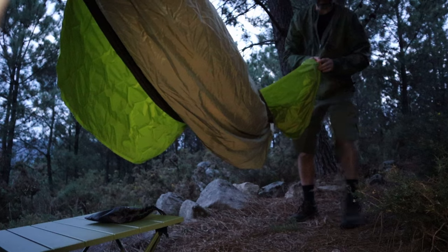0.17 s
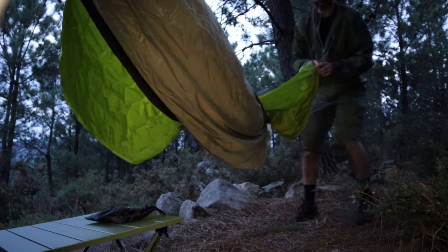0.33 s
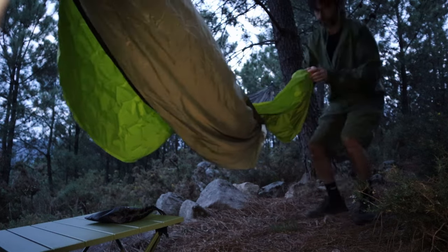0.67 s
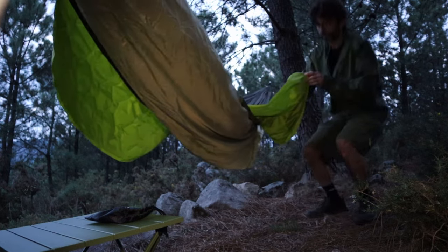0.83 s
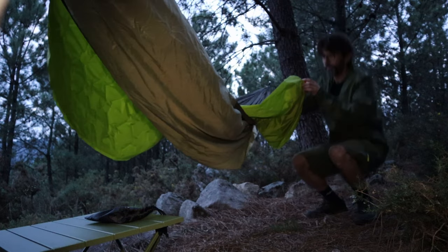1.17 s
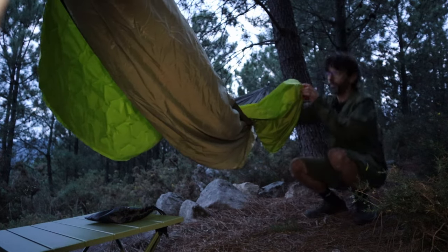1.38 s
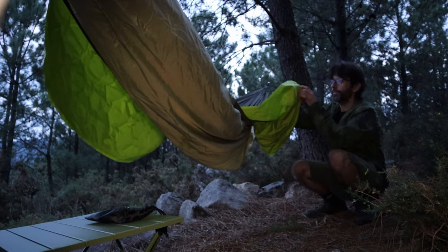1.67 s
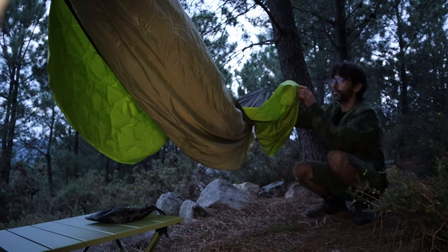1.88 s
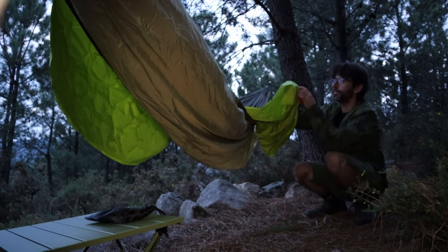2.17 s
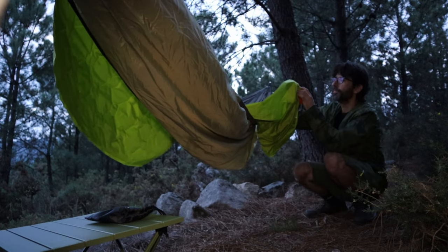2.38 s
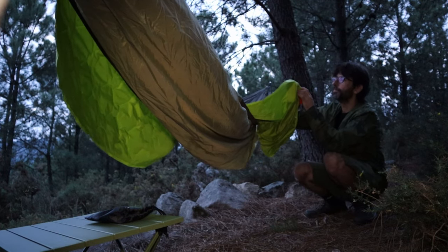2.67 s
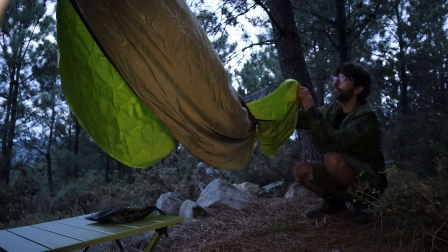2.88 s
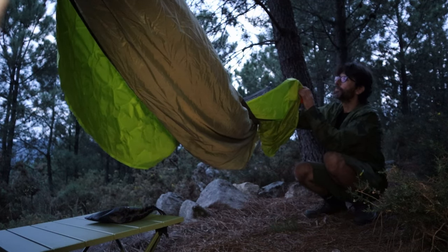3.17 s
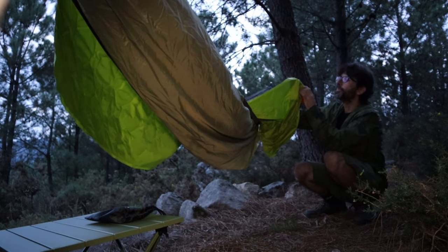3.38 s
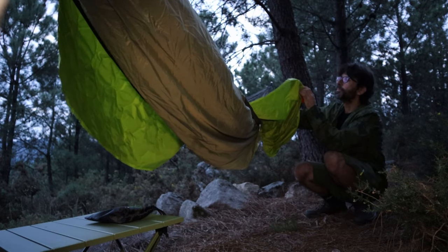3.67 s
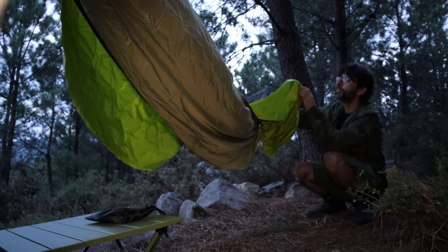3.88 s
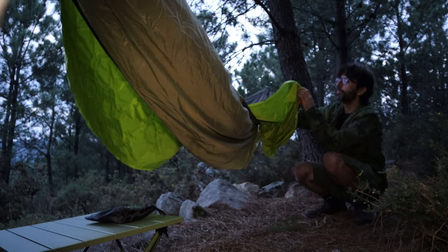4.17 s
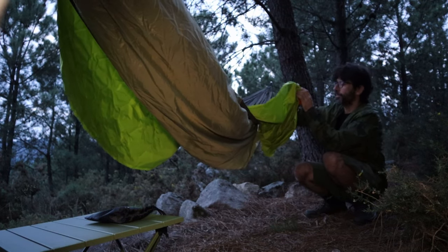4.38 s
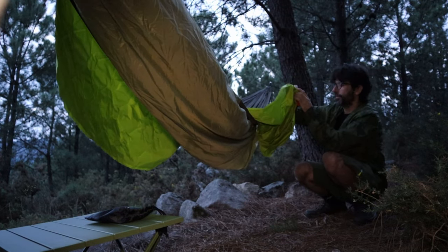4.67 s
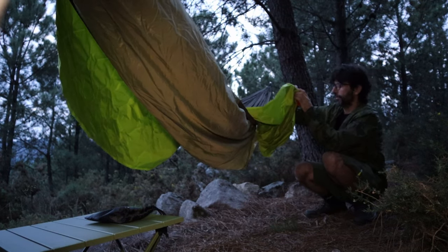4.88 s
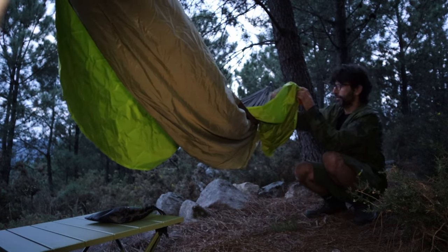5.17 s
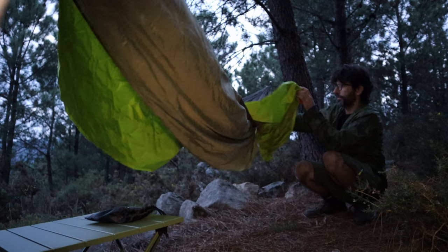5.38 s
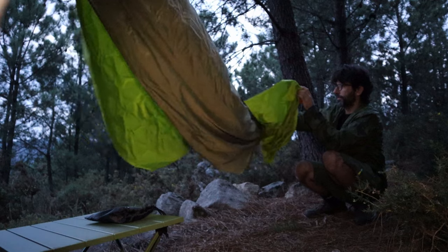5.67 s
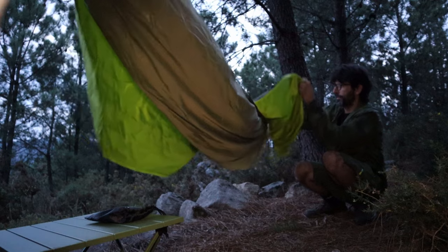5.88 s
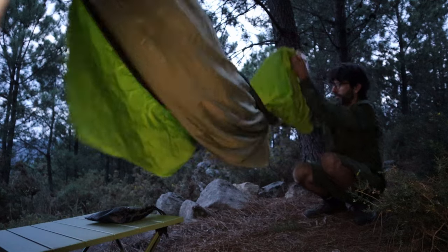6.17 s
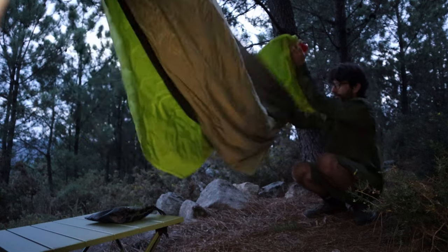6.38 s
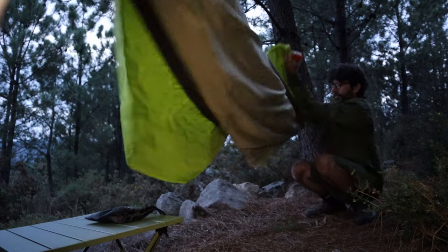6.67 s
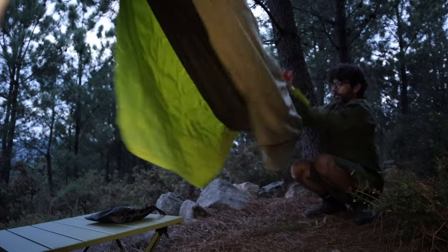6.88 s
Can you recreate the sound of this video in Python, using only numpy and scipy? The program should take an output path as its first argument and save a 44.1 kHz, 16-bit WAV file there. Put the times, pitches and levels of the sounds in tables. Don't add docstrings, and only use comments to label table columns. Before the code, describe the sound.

A palm-sized electric pump runs throughout, sucking air from a sleeping pad in a quiet pine wood. Its thin, shrill whine rides on roaring intake air and vent hiss. The pitch rises slightly, sags near two seconds, then recovers. Late on, the airy tone shifts as the pad is lifted and stretched. Stereo microphone a few steps away, open air, little reverberation.

```python
import sys
import numpy as np
from scipy import signal
from scipy.fft import rfft, irfft, next_fast_len
from scipy.io import wavfile

SR = 44100
rng = np.random.default_rng(int(sys.argv[2]) if len(sys.argv) > 2 else 0)


def level_to_linear(level):
    exponent = np.asarray(level, float) / 20
    return 10 ** exponent


def store_wav(level_fs):
    pcm = np.round(np.clip(np.atleast_2d(level_fs), -1, 1) * 32767)
    wavfile.write(sys.argv[1], SR, pcm.T.astype(np.int16))


N = 310023
SIDES = np.array([[1], [-1]])

# start_s, level_db
WHINE = [(0, -17), (.38, -17.5), (.5, -12), (.8, -21.5), (1.2, -23.5), (1.3, -17), (1.75, -11), (1.88, -15),
         (2.0, -26.5), (3.0, -22.5), (3.2, -14), (3.4, -18), (3.69, -17.5), (4.1, -23.5), (5.0, -29.5),
         (6.25, -26), (6.55, -18), (7.03, -27)]
# start_s, end_s, first_db, last_db
COVERS = [
    (1.842, 3.165, -6.5, -15.5),
    (6.886, 7.1, -11.5, -2),
]
ORDERS_HEARD = [16, 24, 32, 40, 1, 3, 4, 12]
# level_db, then covered_db, bared_db, standing_db, stretched_db
ORDER_LEVELS = [(-32.5, -2.5, 0.1, -4, -3), (-55.5, -4.2, -2.4, -3.5, -1.5), (-59.5, -7, -5, 2, 8),
                (-65, 13, 6, .3, .3), (-47.5, -4, -0.5, -5.5, 5.5), (-56, -10, 10, -10, 15.5),
                (-50.5, 15, .3, -2, 4), (-47.5, -9, -3, .3, 14)]
# shaft_order, level_db
SIDE_ORDERS = [(20, -13), (5, -10)]
# rest_db, covered_db, bared_db, standing_db, stretched_db
WHINE_PAN_DB = [-0.5, -1.5, -0.5, 1, 0.5]
# start_s, length_s, level_db
FIRST_TIPS = [(0.427, .015, -8), (0.705, .03, 2.5), (1.55, .1, -1.5), (3.076, 0.037, 2.5),
              (4.573, 0.019, -0.5), (4.658, 0.031, 6), (4.9, 0.032, -7), (5.2, 0.36, 2.5),
              (5.754, 0.051, 1.5), (5.998, 0.056, 4), (6.254, .02, -2.5), (6.83, 0.023, 1)]
SECOND_TIPS = [(.46, 0.055, -8), (.68, 0.2, -3.5), (1.02, .7, -6), (2.17, 0.59, -5), (3.16, 0.049, 3.5),
               (4.0, 0.6, 1), (4.65, 0.1, -1.5), (5.32, .17, -4), (5.969, .16, -6), (6.6, .2, 6)]
THIRD_TIPS = [(.17, 0.27, 18), (.57, 0.11, 24.6), (.8, 0.42, 13.8), (1.3, .48, 20), (1.84, .03, 28.7),
              (1.92, 1.05, 17), (3.15, 0.303, 4.8), (3.56, 0.062, 12.3), (3.95, .44, 16.6),
              (4.58, 0.21, 16.6), (4.88, .54, 4.8), (5.5, 0.3, 17.1), (5.96, 0.11, 13.4), (6.24, .22, 18.6),
              (6.67, .22, 21.8)]
FOURTH_TIPS = [(.62, .96, 12), (1.88, 1.0, 15), (4.0, .75, 5), (4.95, 0.404, 4.4), (5.5, 0.283, 7.4),
               (6.3, .55, 6.2)]
# start_s, length_s, level_db
ORDER_4_TIPS = [(.3, .25, 9.9), (1.55, 0.23, 13.4), (3.2, 1.515, 6.9)]
ORDER_12_TIPS = [(.42, .2, 8.16), (.95, 0.27, 4.4), (1.45, 0.38, 9.9), (3.25, 1.26, 5)]
TIP_EDGE_S, SNAP_S = 0.044, 0.0081


def order_levels_db(grip):
    whine_db = in_time(WHINE)[0]
    for start_s, end_s, first_db, last_db in COVERS:
        whine_db = whine_db + plateau(start_s, end_s, SNAP_S, first_db, last_db)
    levels_db = {8: whine_db, **dict(zip(ORDERS_HEARD, np.array(ORDER_LEVELS) @ grip))}
    tips_of = {8: FIRST_TIPS, 16: SECOND_TIPS, 24: THIRD_TIPS, 32: FOURTH_TIPS,
               4: ORDER_4_TIPS, 12: ORDER_12_TIPS}
    for order, tips in tips_of.items():
        levels_db[order] = levels_db[order] + held(tips, TIP_EDGE_S)
    for order, level_db in SIDE_ORDERS:
        levels_db[round(order)] = levels_db[4] + level_db
    return levels_db


def rotor(wobble_hz, shimmer_db):
    start_s, end_s = COVERS[0][:2]
    covered = plateau(start_s, end_s, TIP_EDGE_S, 0.52, 0.8)
    bared, stretched = in_time(HAND)[1], in_time(SWING)[1]
    grip = np.array([np.ones(N), covered, bared, standing(), stretched])
    pan_db = WHINE_PAN_DB @ grip
    shaft_hz = (blade_rate() + wobble_hz * drift(30)) / 8
    angle = 2 * np.pi * np.cumsum(shaft_hz) / SR
    out = 0
    for order, level_db in order_levels_db(grip).items():
        above = order / 8 - 1
        pan = pan_db + 2.9 * np.clip(above, 0, 1) * drift(0.41)
        turn = 0.089 * (1 + abs(above)) * drift(15) + (0.2 * drift(3.1) - 0.6) * (above > 1.5)
        flicker_db = shimmer_db * (0.5 + np.clip(above, 0, 2)) * drift(25.5)
        gain = level_to_linear(level_db + SIDES * pan / 2 + flicker_db)
        out = out + np.sqrt(2) * gain * np.sin(order * angle + SIDES * turn)
    return out


# start_s, blade_rate_hz
SPEED = [(0.0, 3199), (0.503, 3233), (0.629, 3326), (1.116, 3406), (1.79, 3176), (1.916, 3068),
         (2.668, 3101), (2.972, 3053), (3.335, 3244), (3.625, 3196), (3.734, 3249), (4.657, 3262),
         (4.919, 3386), (6.025, 3366), (6.128, 3303), (6.524, 3329), (6.86, 3282), (7.03, 3352)]
# centre_s, half_length_s, shift_hz
NUDGES = [(0, .06, 7), (1.21, .08, 6), (1.38, .14, -9), (3.38, .08, -7), (3.51, .06, 11), (3.62, .05, -6),
          (5.77, .12, -7), (6.0, .1, 7), (6.53, .07, 4), (7.03, .05, -8)]


def blade_rate():
    inertia_s = .1
    asked_hz = in_time(SPEED)[0]
    r = np.exp(-1 / (inertia_s * SR))
    lagged_hz = asked_hz[0] + signal.lfilter([1 - r], [1, -r], asked_hz - asked_hz[0])
    return lagged_hz + sum(plateau(s, s, half_s, hz, hz) for s, half_s, hz in NUDGES)


def standing():
    crouch_s, crouch_length_s = .45, .35
    return plateau(0, crouch_s, crouch_length_s, 1, 0.99)


# start_s, outlet_facing_0_1, vents_bared_0_1, housing_tilt_-1_1
HAND = [(0, .3, 0.06, -.1), (.6, 0.2, .2, 0.19), (1.0, 0.35, 0.14, .6), (1.35, 0.73, 0, .6),
        (1.7, 0.97, .1, .8), (2.0, 0.57, 0.08, .9), (2.3, 0.37, 0.02, .1), (2.65, 0.63, 0.07, -.6),
        (2.95, .1, 0.88, -.2), (3.3, 0.39, 0.94, -.2), (4.0, 0, 0.99, .1), (4.4, 0.34, 0.99, -.8),
        (4.75, .5, .15, -.6), (5.0, 0.78, .8, -.3), (5.6, .8, 0, -.8), (5.9, 0.93, .3, .1),
        (6.5, .3, .5, .1), (7.03, 0.89, 0.28, -1)]
# start_s, pump_lifted_0_1, fabric_stretched_0_1
SWING = [
    (5.9, 0.13, 0),
    (6.1, .6, 0.07),
    (6.22, .9, 0.31),
    (6.35, 0.99, 0.83),
    (6.55, 0.55, .95),
    (6.82, 0.2, 0.97),
    (6.92, 0.01, 0.24),
    (7.03, 0.21, 0),
]
# start_s, length_s, strength_0_1
BRUSHES = [
    (.5, .1, 0.65),
    (.68, 0.076, 0.95),
    (1.45, .17, .8),
    (5.98, .2, 0.77),
]


def grip_and_load():
    free_hz, loaded_hz = 3390, 3080
    load = (free_hz - blade_rate()) / (free_hz - loaded_hz)
    brushed = held(BRUSHES, TIP_EDGE_S)
    stoop_s, stoop_length_s, stoop_edge_s = .7, .35, .25
    stooping = plateau(stoop_s, stoop_s + stoop_length_s, stoop_edge_s, 1, 1)
    return np.array([load, standing(), *in_time(HAND), *in_time(SWING), brushed, stooping])


# centre_hz, level_db
INLET = [
    [745, 995, 1510, 1900],
    [-31.5, -32, -37.5, -38],
]
INLET_WIDTH_HZ = [115, 200, 125, 180]
INLET_SLIDE = [
    (6, -2, 1.5, -4),
    (-5, 10, 0.5, 3),
    (-1, .5, 0.9, -1.2),
    (2, 0.44, 0.57, 3),
    (-2.5, 0.53, -0.5, -1),
    (0.2, -0.5, 0.36, 11),
    (0.95, -1, -16, 5.5),
    (0.48, -0.1, -0.08, 0.5),
    (-5, -2.5, 0.16, 0.9),
]
INLET_GAIN_DB = [(-3, 4.5, 3.5, 4.5), (-0.5, -1, -1, -5.5), (2, 2, 1.3, 0), (2.5, 1, -0.8, 0.5),
                 (0.5, -0.5, -1, -2), (-0.5, -3, 10.5, 6.5), (-2.5, -3, 0, -0.5), (0.5, 0, 1.5, -1.5),
                 (1, -3.5, 0, -6)]


def inlet_roar(controls):
    return level_to_linear(-3.0) * resonances(controls, INLET, INLET_SLIDE, INLET_GAIN_DB, INLET_WIDTH_HZ,
                                  flicker_db=0.88, order=[3, 3, 3, 3])


# centre_hz, level_db
VENT = [
    [3681.5, 4500, 5419.5, 7600],
    [-31, -46, -38.5, -39.5],
]
VENT_WIDTH_HZ = [150, 320, 320, 280]
VENT_SLIDE = [(-3.5, -.5, .5, .5), (-1, -.5, 1, .5), (0.04, 1.5, -.5, .3), (1, -0.8, 7, 0.5),
              (-1, -1, -0.1, 7), (1, -5, -2, 1.5), (0, 7.5, -4, 1.5), (-0.2, 2.5, -0.3, -1.1),
              (0.2, 1, -1.5, 0.5)]
VENT_GAIN_DB = [(2, -1.5, -1, -1.5), (-0.5, 3, -3.5, -2), (0.5, 2, -3, 10), (-1.5, 9.5, 7, -3),
                (3.5, -3.3, 4.5, -1), (-16.5, -2.5, -5.5, 0), (4, 10.5, 10, 0), (0, 9, 1, 0.5),
                (0, 2.5, 1, -0.5)]


def vent_hiss(controls):
    return resonances(controls, VENT, VENT_SLIDE, VENT_GAIN_DB, VENT_WIDTH_HZ,
                      flicker_db=1.15, order=[1, 2, 2, 2])


# centre_hz, level_db
RIM = [
    [2751, 8499, 11901],
    [-36, -45.5, -46.5],
]
RIM_WIDTH_HZ = [480, 400, 2600]
RIM_SLIDE = [(1, 0.37, -0.5), (-3.5, 1.2, -1.5), (3, .3, 2), (-5, .3, -4), (0.8, 1, 0.5), (-2, 0.27, -0.5),
             (0.5, .3, .3), (1.07, 1.4, 1.3), (-0.2, 0.25, 1.3)]
RIM_GAIN_DB = [(0.5, 0, -1.5), (1.5, -2, 2), (-2, 1.5, -1.5), (1, 2.4, -0.5), (2.5, 3.5, 1.5),
               (-14, -7, 2.5), (-20, -1, 2), (-0.5, 3, .3), (3, .3, 0.5)]


def rim_whistle(controls):
    return resonances(controls, RIM, RIM_SLIDE, RIM_GAIN_DB, RIM_WIDTH_HZ,
                      flicker_db=1.5, order=[2, 2, 2])


def resonances(controls, rest, slides, gains_db, widths_hz, flicker_db, order):
    out = 0
    centres_hz = np.c_[rest[0]] * (1 + np.transpose(slides) @ controls / 100)
    levels_db = np.c_[rest[1]] + np.transpose(gains_db) @ controls
    for hz, level_db, width_hz, steep in zip(centres_hz, levels_db, widths_hz, order):
        white = rng.standard_normal((2, N)) + 1j * rng.standard_normal((2, N))
        band = signal.sosfilt(signal.butter(steep, width_hz, fs=SR, output="sos"), white)
        carrier = np.exp(2j * np.pi * np.cumsum(hz) / SR)
        mid, side = rms_one(np.real(band * carrier))
        out = out + level_to_linear(level_db + flicker_db * drift(8.2)) * spread(mid, side, hz.mean())
    return out


# start_s, delay_ms, level_db
ECHO = [(0, 1.08, -23), (1, 1.09, -5), (2, 0.98, -12), (3.6, 1.08, -14), (5, 1, -26), (5.7, 0.98, -8),
        (6.1, 1.238, -30), (6.6, 1.5, -15), (7.03, 1.55, -30)]


def echoes(air):
    litter_cut_hz = 1320
    cloth_base_ms, cloth_db = 2.7, -27
    ground_ms, ground_db = in_time(ECHO)
    cloth_ms = cloth_base_ms + .03 * drift(.5)
    dull = signal.sosfilt(signal.butter(2, litter_cut_hz, fs=SR, output="sos"), air)
    now = np.arange(N)
    ground_at = now - ground_ms * SR / 1000 + 3
    cloth_at = now - cloth_ms * SR / 1000
    ground = np.array([np.interp(ground_at, now, c) for c in dull])
    cloth = np.array([np.interp(cloth_at, now, c) for c in air])
    return air + level_to_linear(ground_db) * ground + level_to_linear(cloth_db) * cloth


# pitch_hz, level_db (per Hz)
RUSH = [(18, -48), (30, -11), (92, -7), (351, -10.5), (400, -25), (576, 0), (768, -8), (1330, -5),
        (1560, -15), (2130, -18), (3690, -1.5), (4320, -15), (7880, -10.5), (10200, -70), (15600, -29)]


def rush(patchy_db):
    rush_db = -23
    out = 0
    edges_hz = 28 * 2 ** np.arange(0, 9.6, .5)
    white = rng.standard_normal((2, 2, N))
    for k, (low, high) in enumerate(zip(edges_hz, edges_hz[1:])):
        band = signal.butter(2, [low, high], "band", fs=SR, output="sos")
        mid, side = signal.sosfilt(band, white[k % 2])
        hz = np.sqrt(low * high)
        level_db = at_hz(RUSH, hz) + patchy_db * (drift(0.6) + 0.36 * drift(13))
        out = out + level_to_linear(level_db) * spread(mid, side, hz)
    return level_to_linear(rush_db - 8.5) * rms_one(out)


# pitch_hz, likeness_0_1
LIKENESS = [(95, .99), (150, .9), (290, .84), (640, .93), (1410, .94), (3100, .95), (7800, .78),
            (9000, .45), (11500, .42), (15000, .68)]
# pitch_hz, balance_db
TILT = [(60, -3), (110, 1), (200, -2.5), (380, 10), (700, -2.5), (1290, -2), (2380, -3), (4400, 0.5),
        (8120, -0.5), (15000, 14.5)]


def spread(mid, side, hz):
    alike = np.clip(at_hz(LIKENESS, hz), 0, 1)
    ports = np.sqrt(1 + alike) * mid + SIDES * np.sqrt(1 - alike) * side
    return ports * level_to_linear(SIDES * at_hz(TILT, hz) / 2) / np.sqrt(2)


def rms_one(x):
    return x / np.sqrt(np.mean(np.abs(x) ** 2) + 1e-20)


def in_time(rows):
    s, *columns = np.transpose(rows)
    return [np.interp(np.arange(N) / SR, s, c) for c in columns]


def at_hz(points, hz):
    pitch_hz, value = np.transpose(points)
    return np.interp(np.log(hz), np.log(pitch_hz), value)


def drift(rate_hz):
    r = np.exp(-80 * np.pi * rate_hz / SR)
    white = rng.standard_normal(N // 40 + 2002)
    slow = signal.lfilter([1], [1, -2 * r, r * r], white)[2000:]
    return np.interp(np.arange(N) / 40, np.arange(len(slow)), rms_one(slow))


def plateau(start_s, end_s, edge_s, first, last):
    corners_s = [start_s - edge_s, start_s, end_s, end_s + edge_s]
    return np.interp(np.arange(N) / SR, corners_s, [0, first, last, 0])


def held(events, edge_s):
    return sum(plateau(s, s + length_s, edge_s, level, level) for s, length_s, level in events)


def scene():
    controls = grip_and_load()
    roar = inlet_roar(controls)
    hiss = vent_hiss(controls)
    rim = rim_whistle(controls)
    drop_s, end_s = COVERS[1][:2]
    behind_pad = level_to_linear(plateau(drop_s, end_s, TIP_EDGE_S, -4.5, -4.5))
    air = behind_pad * (roar + hiss) + rim + rush(patchy_db=2.0)
    return rotor(wobble_hz=2.19, shimmer_db=1.06) + echoes(air)


def low_pass(x):
    return signal.sosfilt(signal.butter(12, 15750, fs=SR, output="sos"), x)


# pitch_hz, lead_rad
LEAD = [(0, 0), (260, .2), (780, -.25), (1380, 0), (3190, -.45), (4050, -.3), (4650, -.9), (6370, -.9),
        (7100, -1.3), (7700, -.15), (15200, 0)]


def record(dry):
    size = next_fast_len(N)
    lead_rad = np.interp(np.fft.rfftfreq(size, 1 / SR), *np.transpose(LEAD))
    spectrum = rfft(dry, size) * np.exp(.5j * lead_rad * SIDES)
    ports = irfft(spectrum, size)[:, :N]
    ports = signal.sosfilt(signal.butter(3, 48, "high", fs=SR, output="sos"), ports)
    return low_pass(ports)


dry = scene()
out = record(dry)
store_wav(out)
```